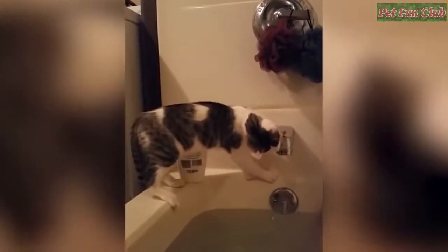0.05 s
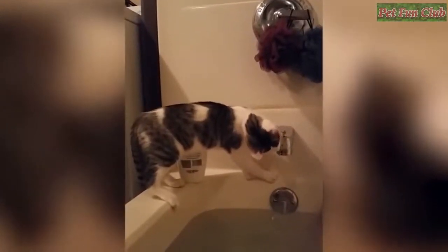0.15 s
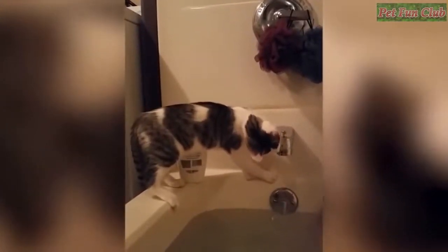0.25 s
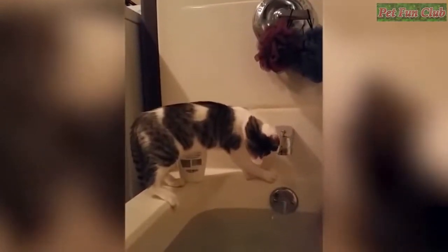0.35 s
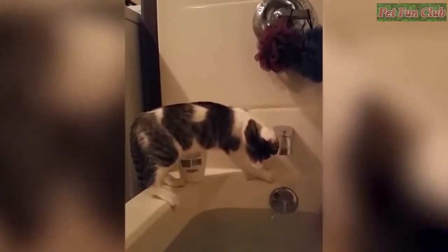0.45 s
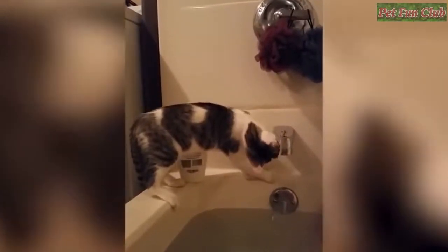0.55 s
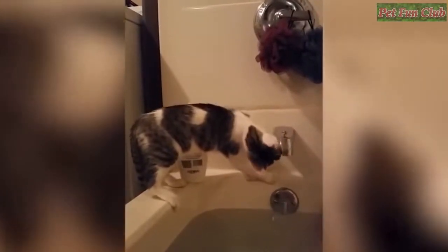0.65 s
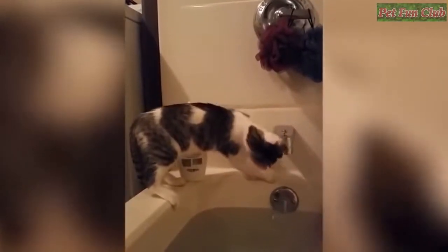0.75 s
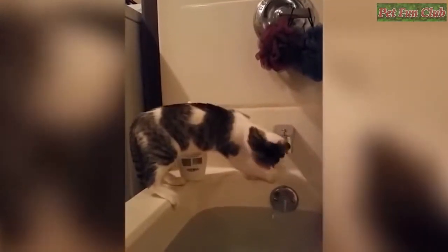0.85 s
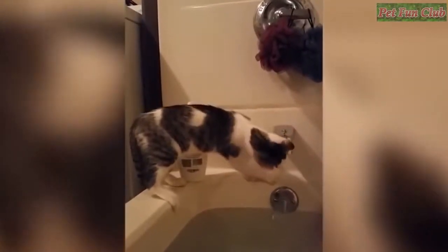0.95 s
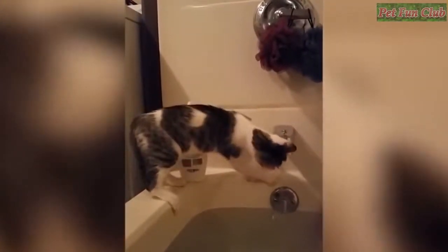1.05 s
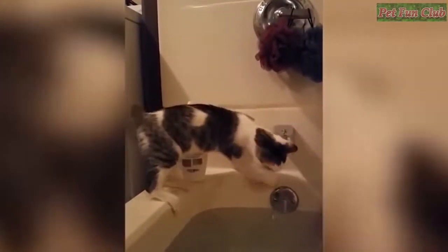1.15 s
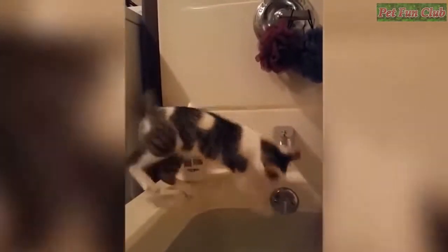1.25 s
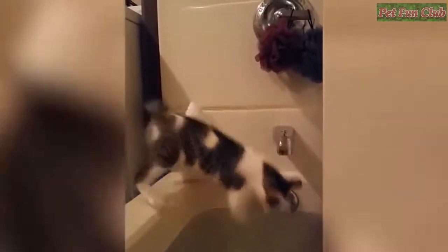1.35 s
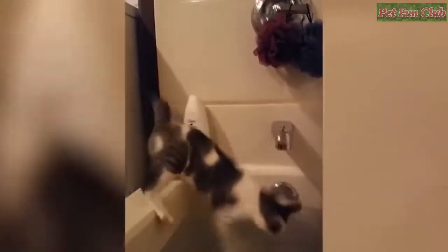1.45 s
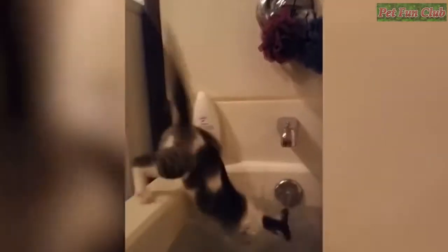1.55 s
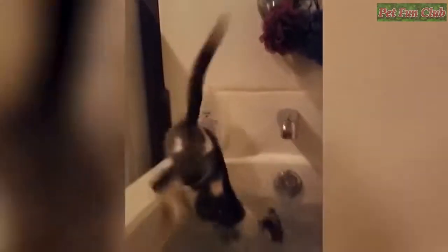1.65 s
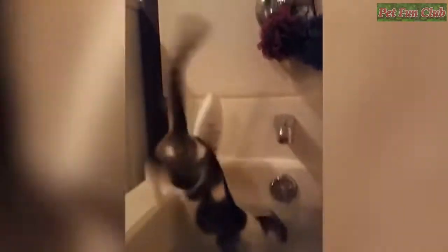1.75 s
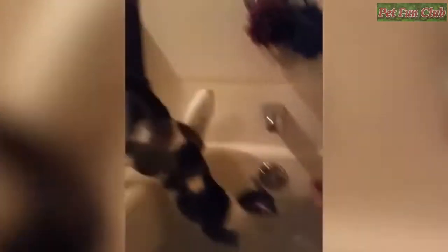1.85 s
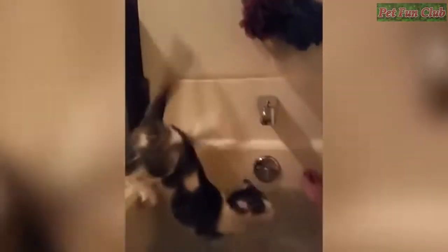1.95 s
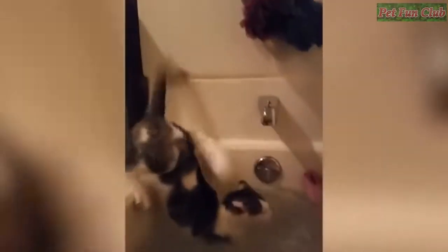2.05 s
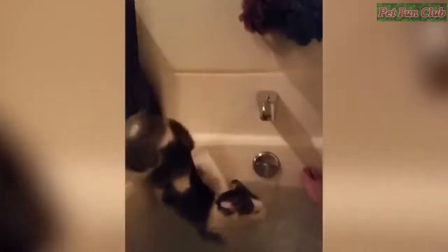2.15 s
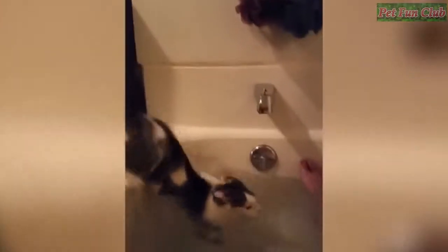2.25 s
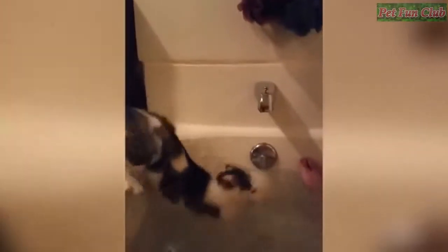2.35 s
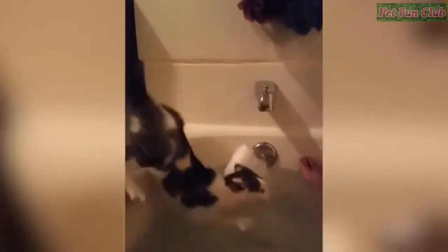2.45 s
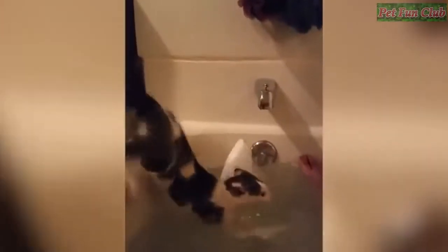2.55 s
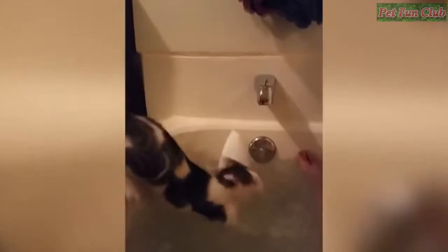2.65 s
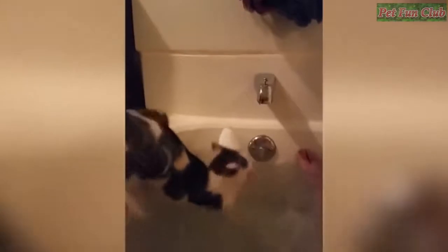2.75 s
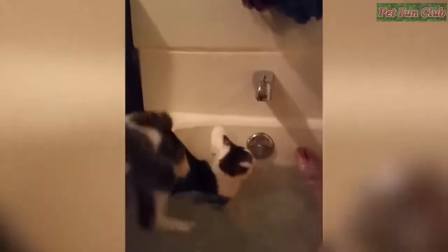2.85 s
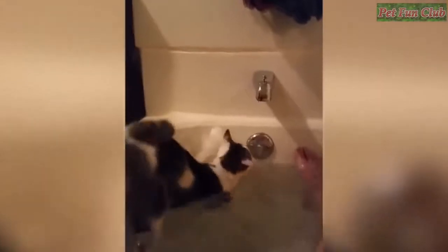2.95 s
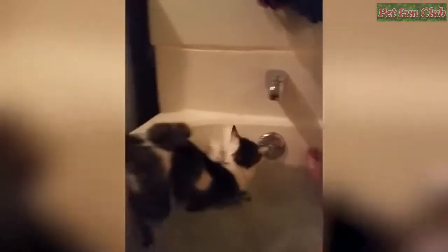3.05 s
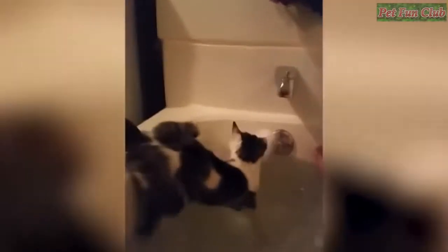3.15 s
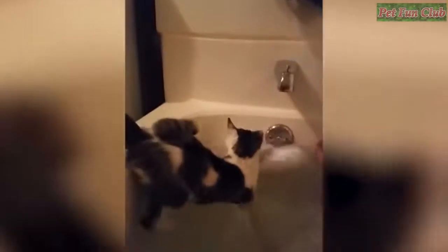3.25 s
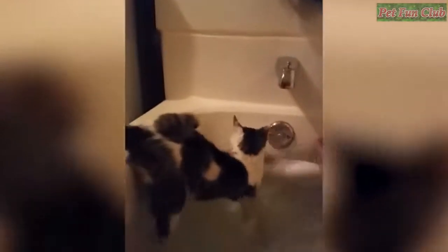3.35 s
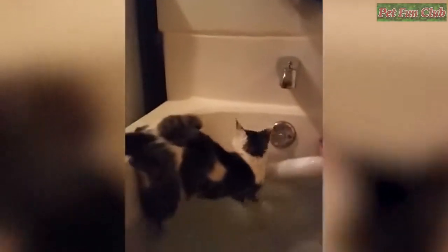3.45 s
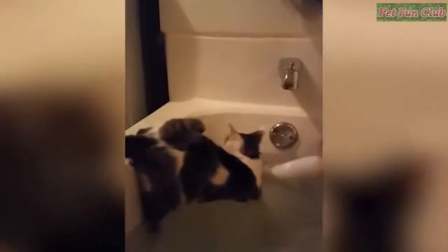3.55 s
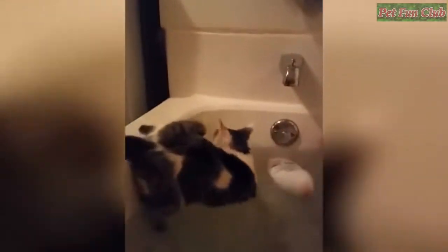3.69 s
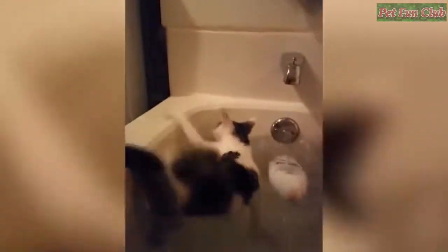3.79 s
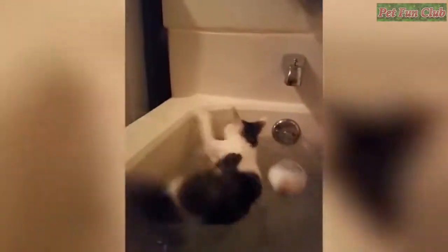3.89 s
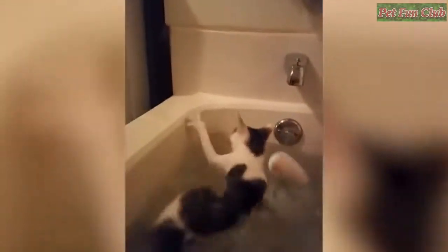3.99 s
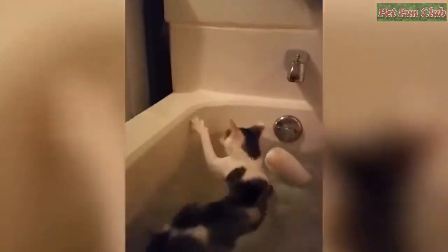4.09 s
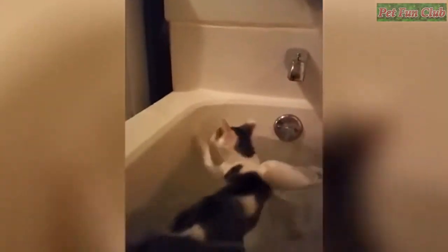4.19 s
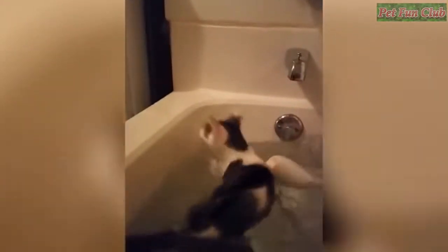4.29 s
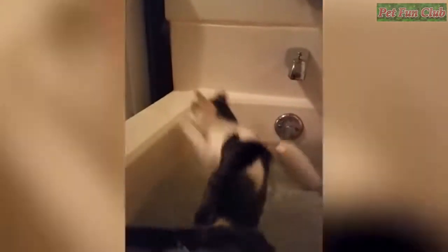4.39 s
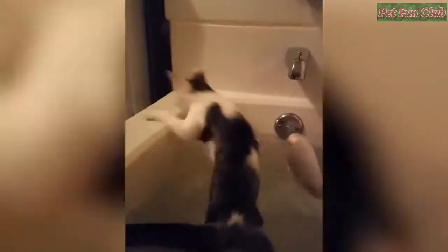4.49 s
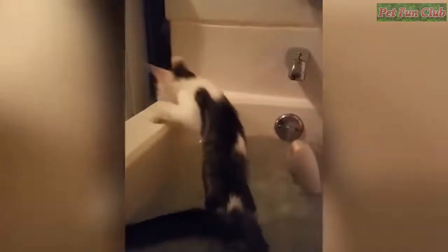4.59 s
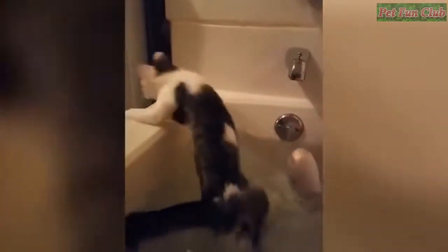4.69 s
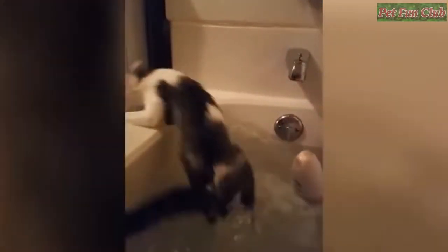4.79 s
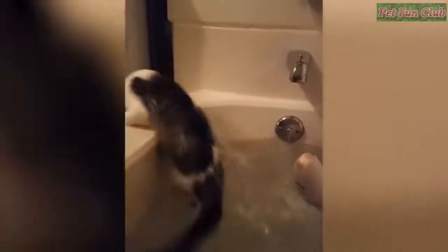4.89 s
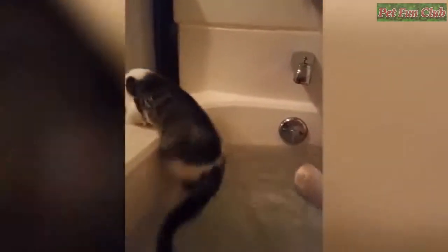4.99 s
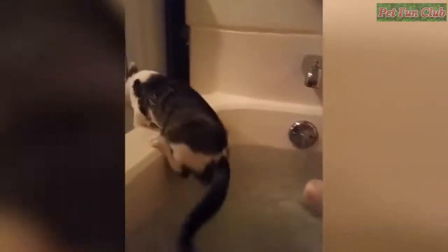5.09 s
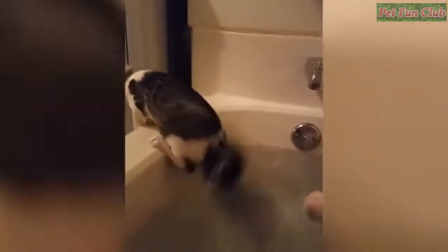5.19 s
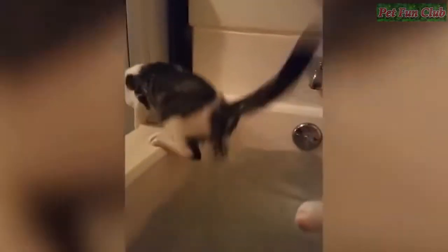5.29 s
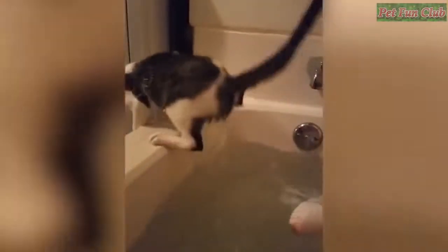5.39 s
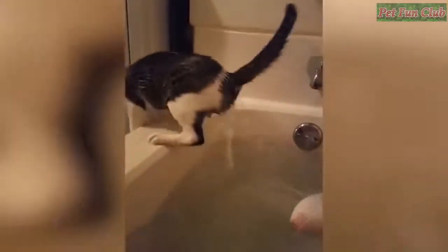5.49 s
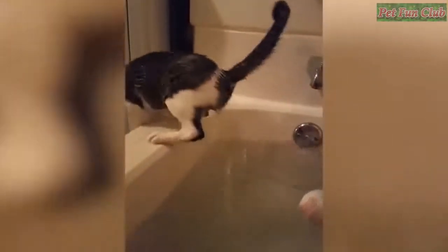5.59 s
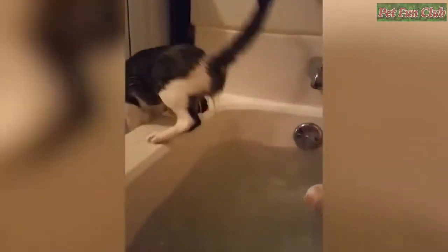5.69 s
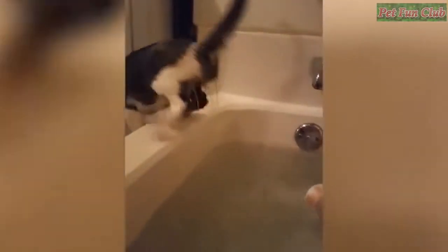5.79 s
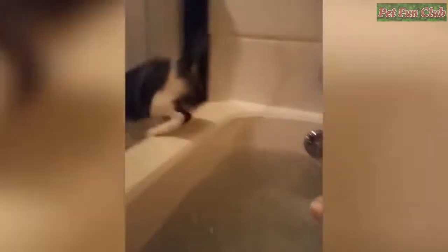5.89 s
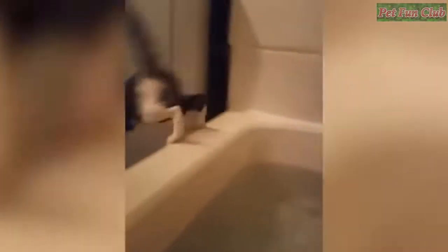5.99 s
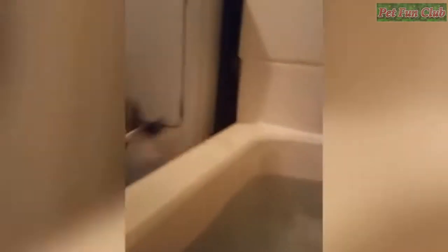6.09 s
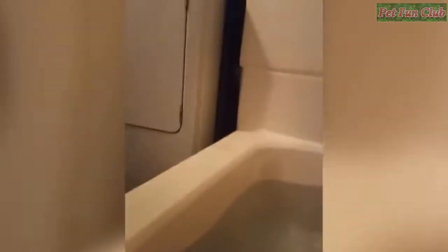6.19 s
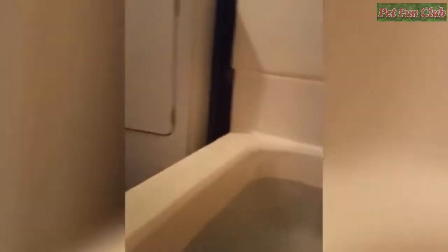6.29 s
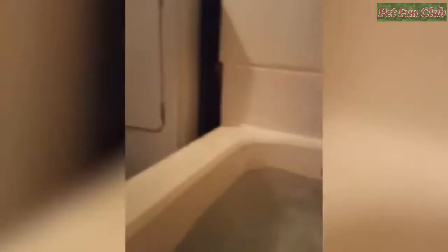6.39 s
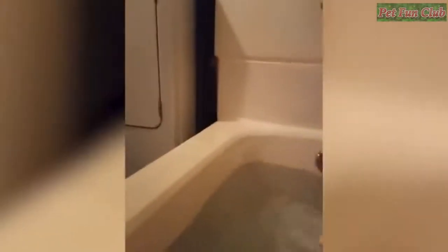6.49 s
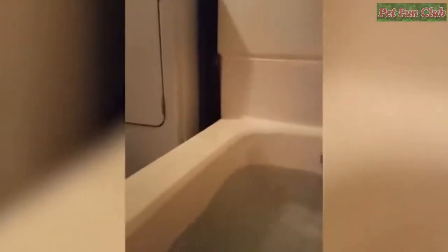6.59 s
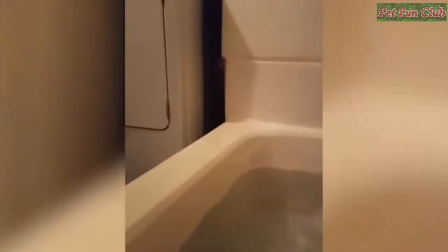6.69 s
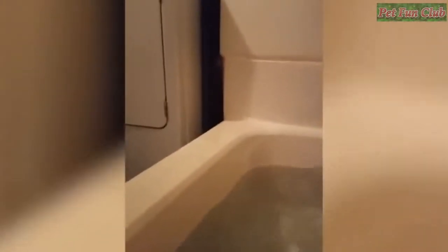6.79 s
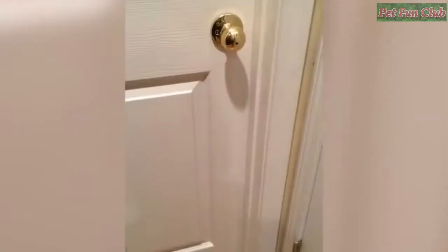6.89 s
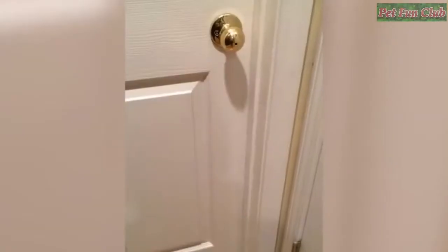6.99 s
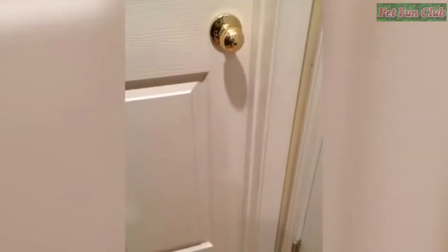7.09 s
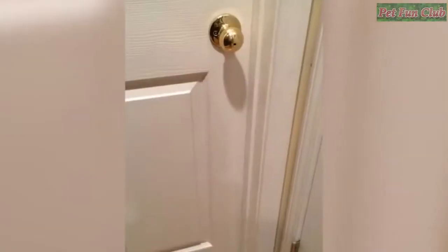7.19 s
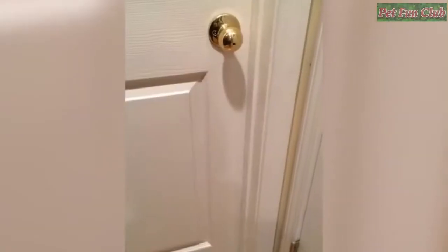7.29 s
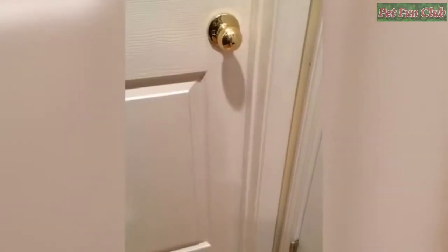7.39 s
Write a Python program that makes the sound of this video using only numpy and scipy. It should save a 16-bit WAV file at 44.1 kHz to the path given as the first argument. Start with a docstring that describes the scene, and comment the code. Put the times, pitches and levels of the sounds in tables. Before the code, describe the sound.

Close handheld phone pickup in a reverberant tub enclosure: near silence, paws skidding on the rim, then a low, heavy plunge with throbbing air pockets. Irregular wet slaps, gurgles and bright droplets follow as the cat scrambles out. Runoff plinks and settling water fade beneath dry case taps; a tiny wet squeak precedes an abrupt cut to low rumble in another room.

```python
"""A low hum, faint rumble and a narrow hiss on the left open in a small hard bathroom; paws shift on the rim.
A cat slips into the filled tub and thrashes: resonators boom, damped tones make air pockets and bubbles,
shaped noise and random clicks make slaps, slosh and spray. Once it is out, water drips and foam fizzes.
The handheld phone is knocked, something wet squeaks, and after a short silence a quieter room hums."""
import sys
import numpy as np
from scipy import signal
from scipy.fft import rfft, irfft, next_fast_len
from scipy.io import wavfile
from scipy.ndimage import uniform_filter1d

SR = 44100
rng = np.random.default_rng(int(sys.argv[2]) if len(sys.argv) > 2 else 0)


def unload_wav(signal):
    """Save mono or channel-first audio to the path in sys.argv[1] as 16-bit WAV at rate SR, clipped to [-1, 1]."""
    wavfile.write(
        sys.argv[1],
        SR,
        np.round(np.clip(np.atleast_2d(signal).T, -1, 1) * 32767).astype(np.int16),
    )


N = 328236
T = np.arange(N) / SR  # time of every sample, s


def undb(db):
    """Decibels to gain."""
    return 10 ** (np.asarray(db) / 20)


def unit(x):
    """Scale to rms 1."""
    return x / np.sqrt(np.mean(x ** 2))


def curves(table):
    """Draw each column after the first as a line through its points in time."""
    s, *columns = np.transpose(table)
    return [np.interp(T, s, column) for column in columns]


def colour(x, points):
    """Filter by a spectrum of (Hz, dB) points, straight lines on a log frequency axis."""
    hz, db = np.transpose(points)
    length = x.shape[-1]
    size = next_fast_len(length + 4096)
    f = np.maximum(np.fft.rfftfreq(size, 1 / SR), 1)
    gain = undb(np.interp(np.log(f), np.log(hz), db))
    return irfft(rfft(x, size) * gain, size)[..., :length]


def resonate(x, hz, width):
    """One resonance, width in Hz, gain 1 at its centre."""
    return signal.lfilter(*signal.iirpeak(hz, hz / width, fs=SR), x)


def resonate_twice(x, hz, first_width, second_width):
    """Two resonances in a row at one pitch, for steeper skirts."""
    return resonate(resonate(x, hz, first_width), hz, second_width)


def noise():
    """White noise for the whole length."""
    return rng.standard_normal(N)


def add(out, s, sound):
    """Mix a sound in at time s."""
    i = int(np.clip(s * SR, 0, N - 1))
    out[i:i + len(sound)] += sound[:N - i]


def fade(t60, attack):
    """A quick rise and an exponential decay of 60 dB in t60; both times in s."""
    t = np.arange(int(max(t60, .002) * SR)) / SR
    return (1 - np.exp(-t / attack)) * undb(-60 * t / t60)


def ring(hz, t60, glide, attack):
    """A damped tone whose pitch moves by the share glide while it dies; negative falls."""
    shape = fade(t60, attack)
    pitch = hz * np.linspace(1, 1 + glide, len(shape))
    return shape * np.sin(2 * np.pi * np.cumsum(pitch) / SR)


def bursts(times, db, t60, attack):
    """The envelope of a series of blows."""
    out = np.zeros(N)
    for s, d, decay in zip(times, db, t60):
        add(out, s, undb(d) * fade(decay, attack))
    return out


def flicker(rate):
    """A random curve with rate new values a second; rms 1."""
    knots = np.arange(0, N / SR + 1, 1 / rate)
    return unit(np.interp(T, knots, rng.standard_normal(4096)[:len(knots)]))


def patter(rate, spread_db):
    """Random clicks, rate a second; with spread_db above 0 most are small and a few large."""
    chance = rng.random(N) * SR / rate
    hit = np.flatnonzero(chance < 1)
    size = np.minimum(-np.log(chance[hit]), 4)
    out = np.zeros(N)
    out[hit] = (-1) ** (hit % 2) * undb(spread_db * size)
    return out


def spread(one, other, side_db):
    """Water breaks all over the tub, so the two ports hear partly different grains."""
    side = undb(side_db) * other * np.array([[1], [-1]])
    return (one + side) / np.sqrt(1 + undb(2 * side_db))


# Quiet bathroom air: f/Hz, relative level/dB per Hz
ROOM_SPECTRUM = [(20, -16), (45, -8), (70, -2.5), (110, -10.5), (300, -19.5), (600, -25), (1200, -37.5),
                 (3000, -45), (15000, -43.5)]
# Narrow hiss: f/Hz, relative level/dB per Hz
HISS_SPECTRUM = [(2500, -21), (3200, -10), (3750, 5), (4150, 6.5), (4650, 0), (5300, -15), (6500, -53)]
# The hiss creeps up, then eases: t/s, level/dB in the left channel
HISS_LEVEL = [(0, -70.5), (1.5, -69), (6.3, -62.5), (7, -66.5)]


def background():
    """A 59.5 Hz hum with a thin noise band, faint room rumble and a narrow hiss mostly on the left."""
    hum_tone = undb(-64.0) * np.sin(2 * np.pi * 59.5 * T)
    hum_band = undb(-87.5) * unit(resonate(noise(), 60, 3.0))
    rumble = undb(-74.0) * unit(colour(noise(), ROOM_SPECTRUM))
    hiss = undb(curves(HISS_LEVEL)[0]) * unit(colour(noise(), HISS_SPECTRUM))
    return hum_tone + hum_band + rumble + hiss * np.array([[1], [.06]])


# Paws shift and skid on the rim: t/s, level/dB, f/Hz, decay/s
RIM_PAWS = [(.052, -73, 374, 0.25), (.075, -70, 254, 0.66), (1.108, -63, 306, 0.085),
            (1.123, -52.5, 159, 0.3), (1.16, -55.5, 101, 0.22), (1.415, -61, 338, 0.2),
            (1.445, -56.5, 236, 0.28)]


def paws():
    """Pads rub the rim in dull shudders: noise through a broad resonance, dying away."""
    out = np.zeros(N)
    for s, db, hz, t60 in RIM_PAWS:
        rub = unit(resonate_twice(noise(), hz, 0.33 * hz, 0.37 * hz))
        out += rub * bursts([s], [db], [t60], attack=0.0022)
    return out


# Fingers on the phone's case: t/s, relative level/dB, starting f/Hz, ring time/s
CASE_KNOCKS = [(0.4952, -39.5, 214, 0.022), (6.1794, -26, 796, 0.0072), (6.1803, -32, 2550, 0.004),
               (6.181, -33, 354, 0.014), (6.2047, -31.5, 890, 0.0083), (6.204, -27, 194, 0.011),
               (6.231, -29, 166, 0.023), (6.343, -37, 150, 0.018), (6.3575, -27.5, 855, 0.009),
               (6.359, -40, 120, 0.05), (6.861, -28.5, 148, 0.017)]


def knocks():
    """Taps reach the microphone through the case, so they are dry; each tone sags slightly."""
    out = np.zeros(N)
    for s, db, hz, t60 in CASE_KNOCKS:
        add(out, s, undb(db + 2.5) * ring(hz, t60, glide=-0.074, attack=0.13 / hz))
    return out


# The cat's strokes, then the last waves against the tub:
# t/s, length/s, relative boom level/dB, slosh level/dB, spray level/dB
STROKES = [(1.537, 0.05, -42.5, -61, -64.5), (1.62, 0.024, -33, -46.5, -53),
           (1.701, 0.021, -31, -40, -42.5), (1.831, 0.033, -25.5, -39, -38.5),
           (1.914, 0.076, -30.5, -46, -57), (2.06, 0.12, -44.5, -46, -47),
           (2.178, 0.091, -47.5, -43.5, -45.5), (2.389, 0.05, -37.5, -43, -41.5),
           (2.453, 0.033, -42.5, -49, -39), (2.584, 0.038, -35, -44.5, -39), (2.682, 0.055, -45, -57, -49),
           (2.722, 0.16, -59, -46.5, -45.5), (3.186, 0.025, -35.5, -46.5, -61),
           (3.228, 0.08, -46, -48, -42.5), (3.315, 0.052, -37, -47, -42), (3.441, 0.018, -47, -47, -50),
           (3.523, 0.037, -51, -52.5, -46), (3.595, 0.079, -52, -49.5, -49),
           (3.717, 0.079, -51, -48, -45.5), (3.877, 0.019, -57, -54, -44), (4.044, 0.077, -43.5, -53, -42),
           (4.168, 0.032, -54, -50, -43), (4.241, 0.05, -51, -52, -46), (4.319, 0.05, -38, -54, -41.5),
           (4.43, 0.022, -50, -51, -40), (4.526, 0.089, -43.5, -44, -44), (4.698, 0.052, -47, -46, -40),
           (4.751, 0.11, -63, -49, -41), (4.94, 0.027, -49.5, -82, -73), (5.044, 0.087, -61, -47.5, -32.5),
           (5.105, 0.18, -40.5, -44.5, -37.5), (5.305, 0.075, -42, -44.5, -39.5),
           (5.502, 0.057, -49.5, -41.5, -41), (5.633, 0.025, -42, -46, -44), (5.701, 0.031, -43, -55, -68),
           (6.004, .1, -47.5, -57.5, -46), (6.19, 0.026, -44, -52, -58), (6.31, 0.028, -58, -61, -59.5),
           (6.432, 0.033, -50.5, -74, -66), (6.567, 0.042, -51.5, -65, -78)]
STROKE_RISE = 0.36  # share of a stroke's length spent building up


def effort(rest_db, stroke_db, t60):
    """Level in dB of one splash part: strokes build up, hold and die away over the rocking water."""
    power = undb(2 * rest_db)
    for (s, length, *_), db in zip(STROKES, stroke_db):
        t = np.arange(int((length + t60) * SR)) / SR
        rise = np.minimum(t / (STROKE_RISE * length), 1)
        decay = undb(-60 * np.maximum(t - length, 0) / t60)
        add(power, s, (undb(db) * rise * decay) ** 2)
    return 10 * np.log10(power)


# Resonances of the filled tub: f/Hz, nominal width/Hz, relative level/dB
TUB_MODES = [(55.4, 36, -10.5), (69, 17, 4), (95.5, 12.9, 4), (116.3, 24, 4.5), (139.4, 19.3, 0.5),
             (164, 10.6, -14), (233.2, 25.6, -3.5), (305, 20.5, -12.5), (389, 30, -9.5), (607, 83, -17.5)]


def churn(db):
    """Waves and limbs shove the water, and the tub booms at its own resonances."""
    shoves = patter(rate=610, spread_db=0)
    boom = np.zeros(N)
    for hz, width, mode_db in TUB_MODES:
        filter_width = 1.43 * width  # passing twice narrows the peak
        boom += undb(mode_db) * resonate_twice(shoves, hz, filter_width, filter_width)
    return unit(boom) * undb(db - 3.0)


def bubble_cloud(low_hz, high_hz, cycles, spread_db, glide, count):
    """Many small bubbles at random times, each rising in pitch as it nears the surface."""
    out = np.zeros(N)
    for when, pitch, length, size in rng.random((count, 4)):
        hz = low_hz * (high_hz / low_hz) ** pitch
        gain = np.sqrt(hz) * undb(spread_db * size ** 2)
        t60 = cycles * (.5 + length) / hz
        add(out, when * N / SR, gain * ring(hz, t60, glide, attack=0.00035))
    return unit(out)


# Torn water: f/Hz, relative level/dB per Hz
SLOSH_SPECTRUM = [(150, -4), (370, 2.5), (490, -10), (610, -1.5), (730, -1), (950, -3.5), (1500, -3),
                  (2500, -4.5), (3300, -9.5), (5000, -13.5), (8000, -48), (11000, -47)]


def slosh(db):
    """Torn water crackles in gurgling lumps, each cavity size on its own, over a cloud of small bubbles."""
    lumps = np.zeros(N)
    for hz in np.geomspace(330, 7500, 9):
        crackle = unit(resonate_twice(patter(rate=5000, spread_db=2.5), hz, 0.59 * hz, 0.43 * hz))
        lumps += np.sqrt(hz) * crackle * undb(6.5 * flicker(rate=45))
    cloud = bubble_cloud(low_hz=461, high_hz=3780, cycles=38.0, spread_db=17.5, glide=0.16, count=1500)
    lumps = undb(-2.0) * unit(colour(lumps, SLOSH_SPECTRUM))
    cloud = undb(-1.5) * unit(colour(cloud, SLOSH_SPECTRUM))
    return undb(db - 5.0) * (lumps + cloud)


# Airborne droplets: f/Hz, relative level/dB per Hz
SPRAY_SPECTRUM = [(1500, -18.5), (3000, -15), (4500, -8), (7000, -12.5), (9300, -16.5), (10300, -6.5),
                  (11500, -0.5), (12800, 3), (14300, 3), (15800, -4.5)]
DROPLETS_PER_S, DROPLET_DB = 110, -6.5  # larger droplets, level against the fine spray


def spray(db):
    """Fine droplets rain back on the water and tub wall in flurries; a few larger ones tick and shatter."""
    fine = patter(rate=3000, spread_db=0)
    landings = np.abs(patter(rate=DROPLETS_PER_S, spread_db=1.5))
    shatter = signal.fftconvolve(landings, fade(0.025, attack=0.00014))[:N]
    coarse = shatter * noise()
    rain = unit(colour(fine, SPRAY_SPECTRUM)) + undb(DROPLET_DB) * unit(colour(coarse, SPRAY_SPECTRUM))
    return undb(db - 1.5 + 1.6 * flicker(rate=150)) * rain


# Flung drops land close to the phone: t/s, relative level/dB, decay/s
NEAR_DROPS = [(1.616, -49.5, 0.026), (2.372, -42, 0.09), (2.888, -29.5, 0.015), (3.069, -37, .008),
              (3.103, -32, 0.0064), (3.116, -42, 0.15), (4.4186, -28.5, 0.012), (4.707, -25, 0.0066),
              (5.744, -30, 0.0024), (5.7928, -38, 0.0092), (5.8434, -34.5, 0.047), (5.947, -40, 0.024),
              (5.954, -33.5, 0.027), (6.0076, -40, 0.024)]
TICK_DB = 3  # a near drop's first tick against its fizz


def drops():
    """A near drop lands with one very bright tick and shatters into a short fizz of noise."""
    s, db, t60 = np.transpose(NEAR_DROPS)
    out = bursts(s, db, t60, attack=0.00045) * unit(colour(noise(), SPRAY_SPECTRUM))
    for when, drop_db, _ in NEAR_DROPS:
        add(out, when, undb(drop_db + TICK_DB) * ring(12000, .006, glide=.4, attack=.0002))
    return out


# Paws and flanks slap the surface: t/s, relative level/dB, f/Hz, decay/s
SLAPS = [(1.629, -33.5, 580, 0.058), (1.713, -33.5, 435, 0.05), (1.841, -29, 460, 0.09),
         (1.848, -27, 570, 0.36), (2.2, -28, 620, 0.052), (2.244, -34.5, 770, 0.053),
         (2.41, -34.5, 500, 0.04), (2.532, -34.5, 1600, 0.11), (2.596, -27.5, 596, 0.048),
         (2.819, -35.5, 757, 0.19), (2.865, -36.5, 2170, 0.08), (3.193, -36.5, 603, 0.11),
         (3.275, -30, 720, 0.11), (3.454, -38, 2390, 0.15), (3.632, -30.5, 1900, 0.061),
         (3.745, -36.5, 640, 0.12), (3.89, -38, 1310, 0.079), (4.071, -32.5, 1690, 0.17),
         (4.243, -39, 1100, 0.42), (4.318, -36.5, 670, 0.27), (4.371, -32, 748, 0.15),
         (4.67, -32.5, 1210, 0.14), (4.771, -35, 1350, 0.22), (4.877, -33.5, 1540, 0.1),
         (5.054, -29, 874, 0.12), (5.109, -32.5, 694, 0.29), (5.219, -33.5, 1070, 0.22),
         (5.302, -24, 1526, 0.06), (5.428, -33.5, 930, 0.054), (5.539, -30, 1430, 0.095),
         (5.602, -35, 775, 0.25), (6.042, -43, 570, 0.071), (6.572, -51, 817, 0.35)]
# Tone of all slaps: f/Hz, gain/dB
SLAP_TONE = [(120, -17), (350, -0.5), (2600, -4), (3400, -7), (6000, -1.5), (11000, -27)]


def slaps():
    """Each slap smacks, then the hollow it opens in the water rings broadly at its own pitch."""
    out = np.zeros(N)
    for s, db, hz, t60 in SLAPS:
        shape = fade(t60, attack=0.00035)
        add(shape, 0, undb(1) * fade(0.0069, attack=0.00014))  # the smack
        rush = rng.standard_normal(SR // 2)
        hollow = unit(resonate(rush, hz, 0.7 * hz))[:len(shape)]
        add(out, s, undb(db - 6.0) * shape[:len(rush)] * hollow)
    return colour(out, SLAP_TONE)


# Large bubbles surfacing among the slaps: t/s, starting f/Hz, level/dB before the room
BUBBLES = [(1.713, 2040, -41), (1.849, 1576, -32), (2.007, 1090, -38), (2.109, 2850, -36),
           (2.413, 1130, -35.5), (2.596, 1955, -37), (2.615, 585, -30), (2.747, 833, -38.5),
           (2.789, 810, -36.5), (3.634, 2450, -39), (3.346, 753, -38), (3.922, 1715, -38.5),
           (4.343, 1236, -38.5), (4.373, 1096, -33), (4.397, 680, -34), (4.708, 600, -40.5),
           (5.031, 1310, -37.5), (5.054, 1195, -33), (5.145, 604, -34), (5.262, 604, -34),
           (5.323, 720, -34), (5.378, 1950, -37.5), (5.71, 1170, -43.5)]
# Water runs off the fur in quick plinks: t/s, starting f/Hz, level/dB before wobble and room
DRIPS = [(2.974, 1000, -43.5), (3.511, 1160, -45), (5.482, 1310, -45), (5.73, 2490, -42),
         (5.745, 2920, -41), (5.792, 1870, -48), (5.794, 2320, -35.5), (5.845, 1884, -46),
         (5.936, 2170, -38), (5.948, 1660, -41.5), (5.996, 1810, -44)]
TRAPPED_DB = -6  # every slap traps a bubble of its own pitch, against the slap's table level


def bubbles():
    """Large bubbles plop under slaps and out of the slosh; drips chirp up faster and wobble."""
    trapped = [(s, hz, db + TRAPPED_DB) for s, db, hz, _ in SLAPS]
    plops = np.zeros(N)
    for s, hz, db in list(BUBBLES) + trapped:
        add(plops, s, undb(db) * ring(hz, 1.74 / np.sqrt(hz), glide=0.25, attack=0.00034))
    plinks = np.zeros(N)
    for s, hz, db in DRIPS:
        add(plinks, s, undb(db) * ring(hz, 0.036, glide=0.65, attack=0.0015))
    return plops + plinks * (1 + .7 * flicker(rate=480))


# The body or a leg drives air under water: t/s, level/dB before the room, starting f/Hz
AIR_PLUNGES = [(1.715, -17, 116.5), (1.716, -18.5, 233.5), (1.715, -25, 335), (1.732, -24, 74),
               (1.785, -19.5, 151), (1.843, -22.5, 348), (1.847, -24, 104), (1.912, -21, 157),
               (1.959, -22.5, 101.8), (2.597, -30, 348), (2.606, -23.5, 226), (3.189, -30, 132.5),
               (3.193, -34, 304), (3.76, -51, 382), (4.308, -27, 353), (4.366, -33, 229.5),
               (4.566, -32, 361), (5.114, -31, 367), (5.124, -34.5, 237.7), (5.169, -35.5, 64.7),
               (5.304, -36, 144.3), (5.585, -33, 417), (5.651, -37, 154.5)]
CAVITY_CYCLES = 33  # nominal cycles an air pocket takes to fall 60 dB


def plunges():
    """Big air pockets throb under the surface; the larger, the lower and longer."""
    out = np.zeros(N)
    for s, db, hz in AIR_PLUNGES:
        add(out, s, undb(db) * ring(hz, CAVITY_CYCLES / hz, glide=0.06, attack=0.003))
    return out


# The fizz sounds only in the top treble: f/Hz, relative level/dB per Hz
FOAM_SPECTRUM = [(9500, -40), (11000, -13), (12300, -1.5), (14300, 3), (15800, -4.5)]
FOAM_START_S, FOAM_RISE_S = 6.2, 0.054
FOAM_DB, FOAM_FALL_DB_PER_S = -49.5, 35.5


def fizz():
    """Foam left by the struggle bursts as a fine, dying hiss of clicks."""
    age = np.maximum(T - FOAM_START_S, 0)
    level = undb(FOAM_DB - FOAM_FALL_DB_PER_S * age) * np.minimum(age / FOAM_RISE_S, 1)
    return level * unit(colour(patter(rate=8100, spread_db=4.5), FOAM_SPECTRUM))


# Something wet squeaks briefly: t/s, centre f/Hz, centre level/dB before the room
WET_SQUEAK = [(6.804, 560, -60), (6.811, 557, -51), (6.824, 587, -59), (6.829, 564, -37.5),
              (6.846, 600, -44), (6.857, 554, -48), (6.88, 580, -72)]


def squeak():
    """A short unsteady tone with a weak octave and one unrelated overtone."""
    hz, db = curves(WET_SQUEAK)
    waver = unit(uniform_filter1d(noise(), size=150))
    phase = 2 * np.pi * np.cumsum(hz * (1 + 0.073 * waver)) / SR
    tone = np.sin(phase) + undb(-20) * np.sin(2 * phase) + undb(-14) * np.sin(2.66 * phase)
    sounding = (T > WET_SQUEAK[0][0]) * (T < WET_SQUEAK[-1][0])
    return tone * undb(db + 1.5 * waver) * sounding


# The other room's rumble: f/Hz, relative level/dB per Hz
HALL_SPECTRUM = [(20, -2.5), (35, 0), (100, 2.5), (200, -12), (350, -18), (600, -23), (850, -28.5),
                 (1400, -30.5), (2400, -31.5), (3500, -36), (7000, -39.5), (15000, -46)]
# Hum tones in the other room: f/Hz, centre level/dB
HALL_HUM = [(91.5, -63), (296, -70), (651, -79.5), (2430, -88)]
# A faint whine sinks in pitch: t/s, centre f/Hz, centre level/dB
HALL_WHINE = [(7.03, 1236, -82), (7.13, 1215, -74), (7.25, 1120, -72), (7.44, 1030, -75)]


def hall():
    """The other room: nearly mono low rumble and flickering hum under a faint, wavering whine."""
    hz, db = curves(HALL_WHINE)
    mid, side = (unit(colour(noise(), HALL_SPECTRUM)) for _ in range(2))
    rumble = undb(-56.5) * (mid + undb(-50) * side * np.array([[1], [-1]]))
    hum = sum(undb(d + 2.2 * flicker(rate=15)) * np.sin(2 * np.pi * f * T) for f, d in HALL_HUM)
    whine_hz = hz * (1 + 0.031 * flicker(rate=93))
    whine = undb(db + 2.2 * flicker(rate=22)) * np.sin(2 * np.pi * np.cumsum(whine_hz) / SR)
    return rumble + hum + whine


def bathroom(x, t60, tail_db, wet_db):
    """The tub's walls answer at once and the room rings on; the sides are most alike in the bass."""
    shape = undb(tail_db) * fade(t60, attack=0.0057)
    add(shape, 0, fade(0.035, attack=0.0006))  # early answer of the walls
    mid, side = rng.standard_normal((2, SR))[:, :len(shape)] * shape / np.sqrt(2 * np.sum(shape ** 2))
    mid = colour(mid, [(100, -10), (400, 3.5), (1200, 2.0)])
    side = colour(side, [(120, -11.5), (300, -0.5), (1000, -2.5), (2500, 8.5), (12000, 2.0)])
    echoes = np.array([mid + side, mid - side])
    wet = signal.fftconvolve(np.broadcast_to(x, (2, N)), echoes, axes=1)[:, :N]
    return (x + undb(wet_db) * wet) / np.sqrt(1 + undb(2 * wet_db) / 2)


# Water rocks and trickles between strokes: t/s, relative boom level/dB, slosh level/dB, spray level/dB
SWELL = [(1.5, -57, -79, -83), (1.59, -48, -82, -69), (1.74, -32.5, -43.5, -44), (1.88, -28.5, -46, -43),
         (2.06, -42, -42.5, -36.5), (2.26, -45.5, -56, -52), (2.67, -41.5, -51.5, -41.5),
         (3.0, -47.5, -55, -50.5), (3.45, -70, -53.5, -48), (3.9, -53, -55, -48.5), (4.51, -47, -49, -44),
         (5.06, -49.5, -59, -47), (5.26, -44.5, -43, -41.5), (5.89, -56, -66.5, -44),
         (6.32, -48.5, -65, -61), (6.96, -71.5, -74, -92)]
SWELL_BOOM_DB, SWELL_SLOSH_DB, SWELL_SPRAY_DB = -1, -1.5, -4.5  # added to the table's levels
BOOM_T60_S, SLOSH_T60_S, SPRAY_T60_S = 0.32, 0.17, 0.17  # how each part dies after a stroke
CUT_S, RESUME_S = 6.965, 7.02  # silence between the two rooms


def scene():
    """The bathroom, a short silence, then the other room."""
    rest_boom, rest_slosh, rest_spray = curves(SWELL)
    _, _, stroke_boom, stroke_slosh, stroke_spray = np.transpose(STROKES)
    churn_db = effort(rest_boom + SWELL_BOOM_DB, stroke_boom, BOOM_T60_S)
    slosh_db = effort(rest_slosh + SWELL_SLOSH_DB, stroke_slosh, SLOSH_T60_S)
    spray_db = effort(rest_spray + SWELL_SPRAY_DB, stroke_spray, SPRAY_T60_S)
    stirred = np.clip((T - 1.49) / 0.03, 0, 1)  # the water lies still until the cat touches it

    boom = stirred * spread(churn(churn_db), churn(churn_db), side_db=-26.5)
    boom = boom + plunges() + paws()
    wash = stirred * spread(slosh(slosh_db), slosh(slosh_db), side_db=-4.0)
    wash = wash + spread(slaps(), slaps(), side_db=-5.5) + bubbles()
    mist = stirred * spread(spray(spray_db), spray(spray_db), side_db=-1.5)
    mist = mist + spread(fizz(), fizz(), side_db=-12)

    low = bathroom(boom, t60=0.37, tail_db=-14.5, wet_db=-6.0)
    middle = bathroom(wash, t60=0.3, tail_db=-8, wet_db=-4.0)
    high = bathroom(mist, t60=0.12, tail_db=-31, wet_db=-5.5)
    near = bathroom(drops(), t60=0.17, tail_db=-14, wet_db=-2)
    near = near + bathroom(squeak(), t60=0.16, tail_db=-4, wet_db=-3.5) + knocks()
    first_room = low + middle + high + near + background()
    return first_room * (T < CUT_S) + hall() * (T > RESUME_S)


# Microphone ports, the right one dull in the presence range: f/Hz, left level/dB, right level/dB
PORTS = [(98, 1, 2.5), (395, 0.4, 2), (790, 1.54, 0), (2550, -0.54, 1), (4030, 2.5, -2), (5200, 1, -15.5),
         (7300, 2, -10.5), (9050, 1, -3.5), (11700, 1, -0.3), (15600, -5.5, -1.2)]
TOP_HZ = 15900  # upper limit of the microphone


def record(dry):
    """Each microphone port has its own colour; the top is cut steeply."""
    ports = np.array(PORTS)
    left = colour(dry[0], ports[:, [0, 1]])
    right = colour(dry[1], ports[:, [0, 2]])
    top_cut = signal.ellip(10, .2, 70, TOP_HZ, fs=SR, output="sos")
    return signal.sosfilt(top_cut, np.array([left, right]))


dry = scene()
out = record(dry)
unload_wav(out)
```